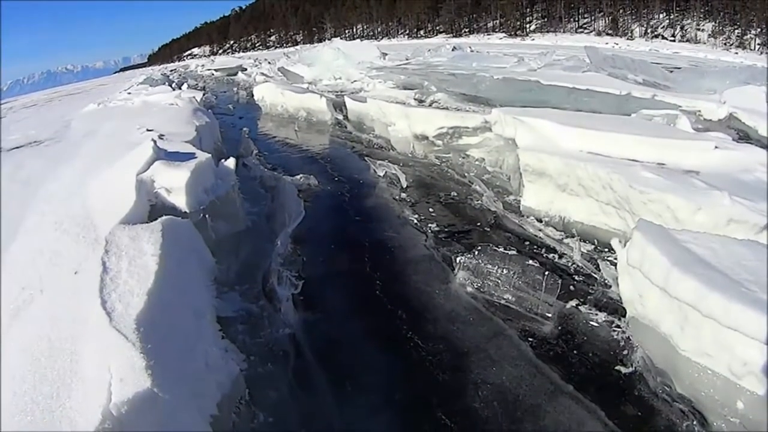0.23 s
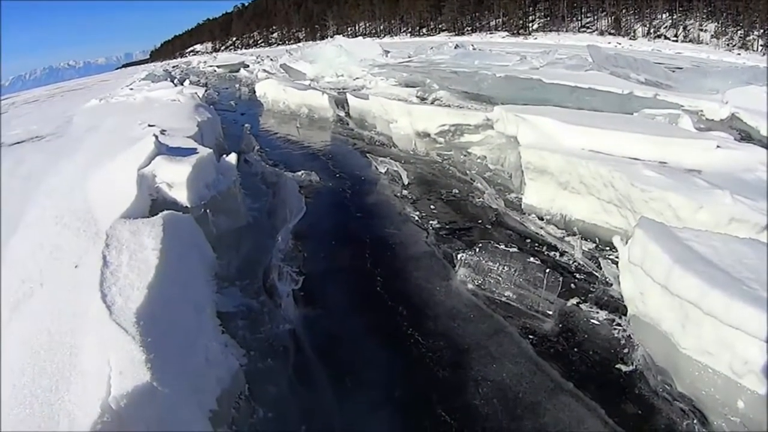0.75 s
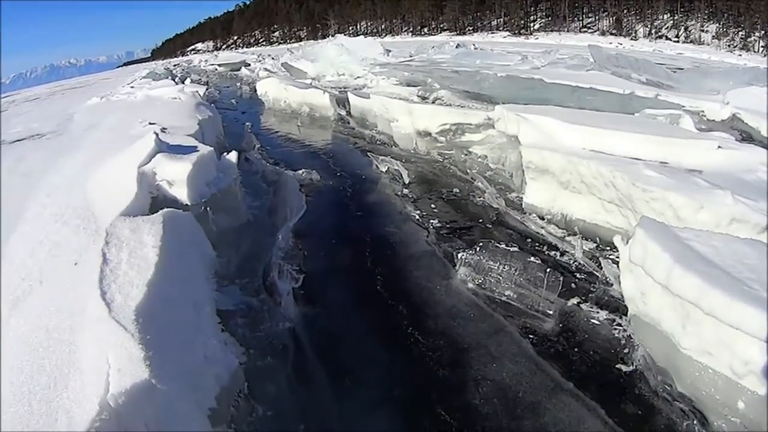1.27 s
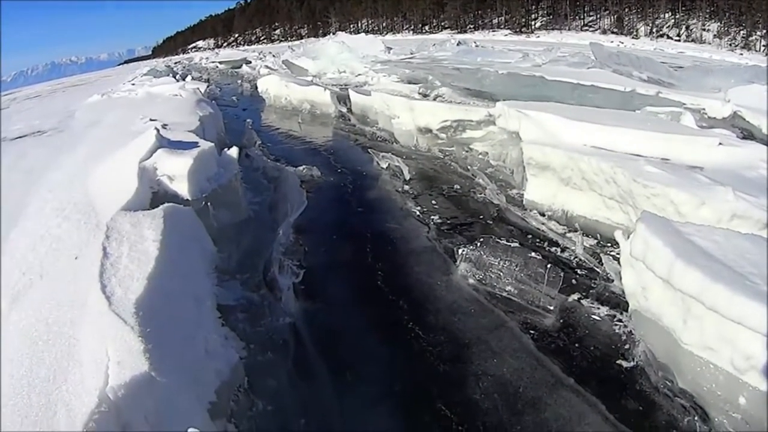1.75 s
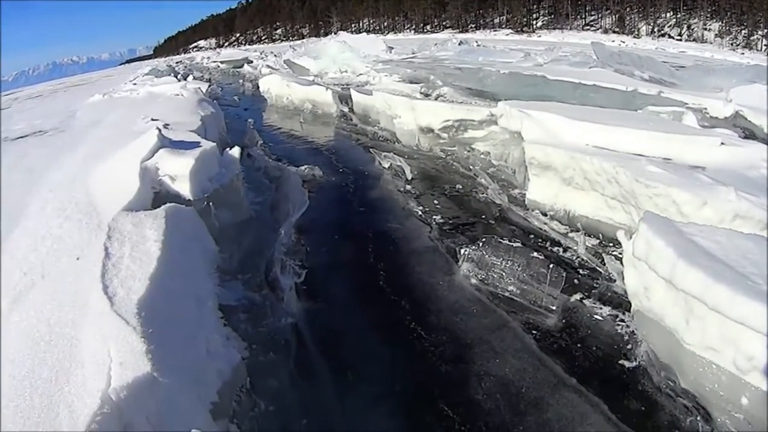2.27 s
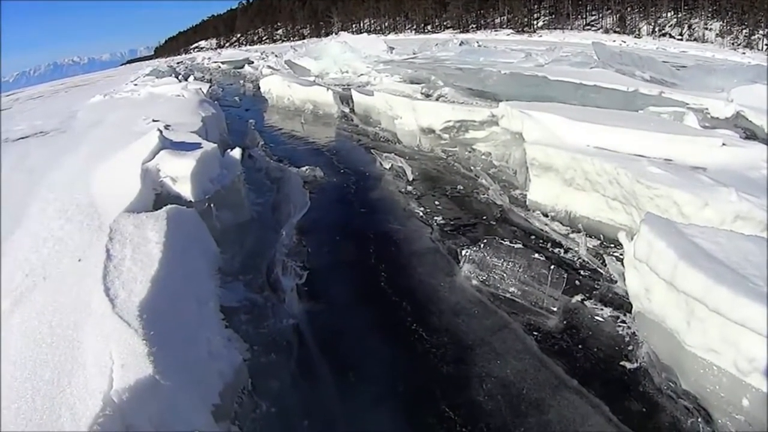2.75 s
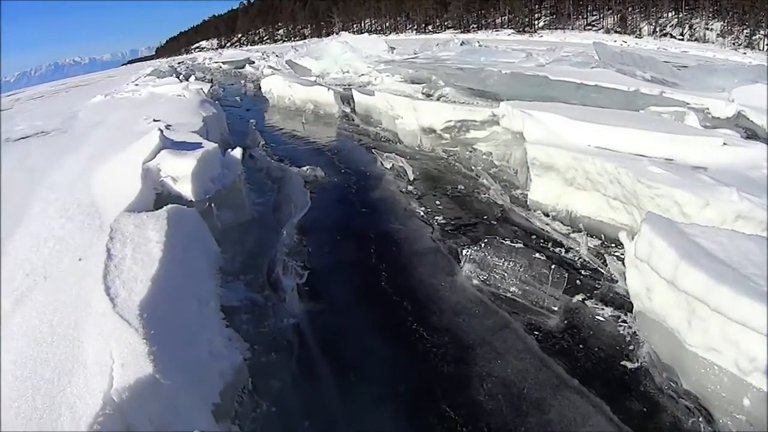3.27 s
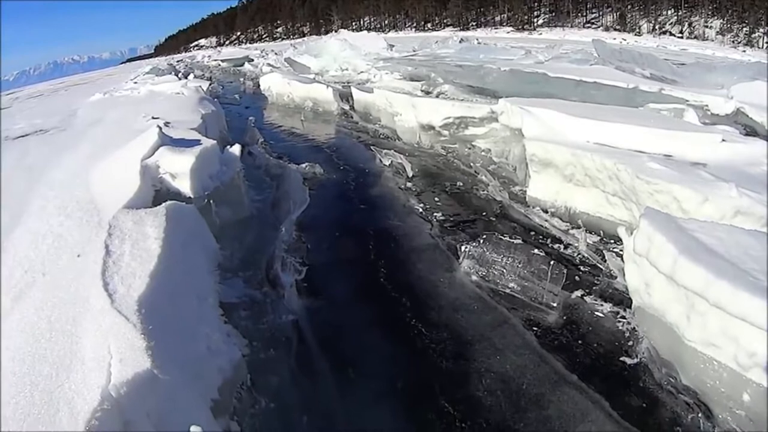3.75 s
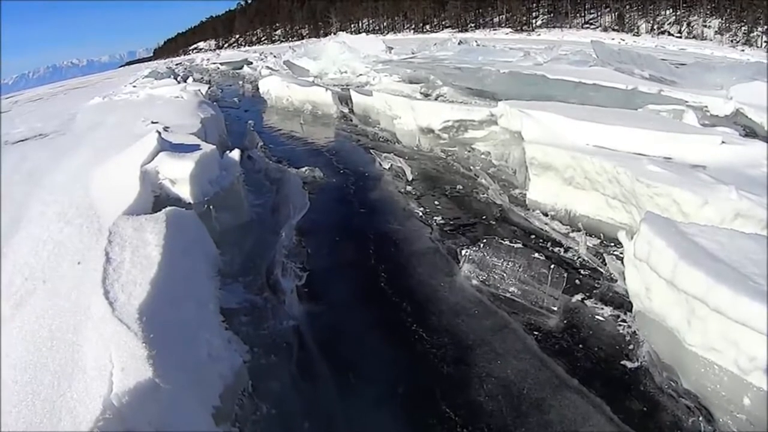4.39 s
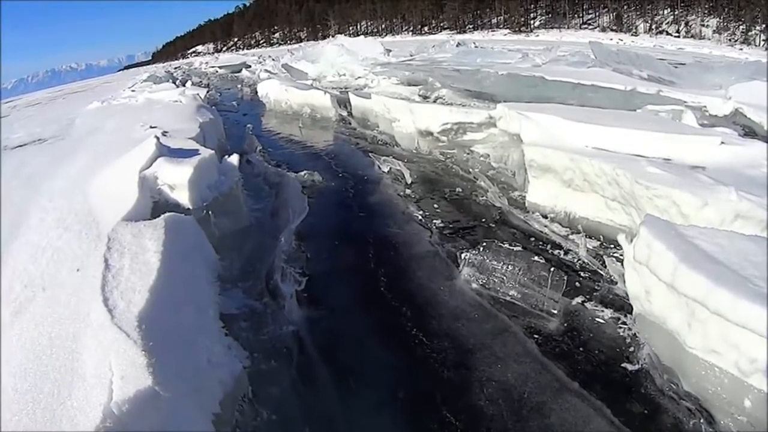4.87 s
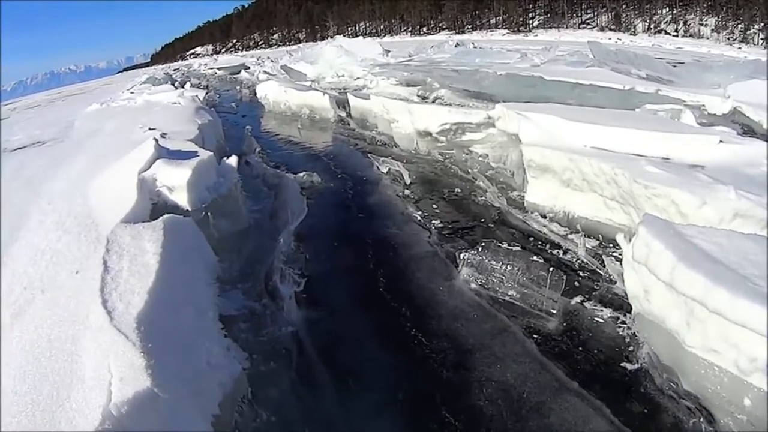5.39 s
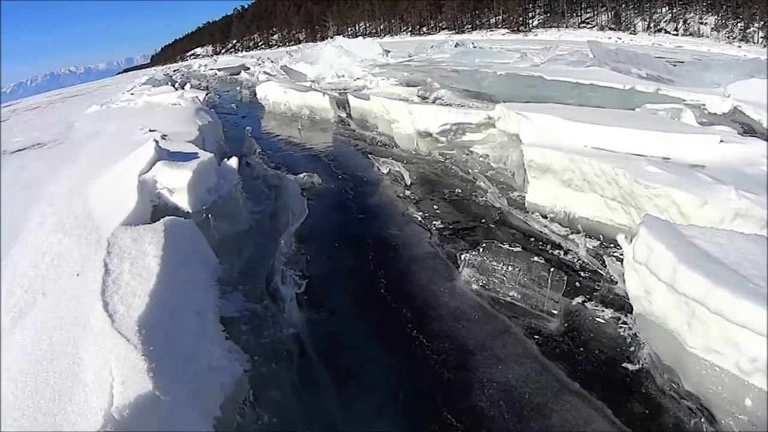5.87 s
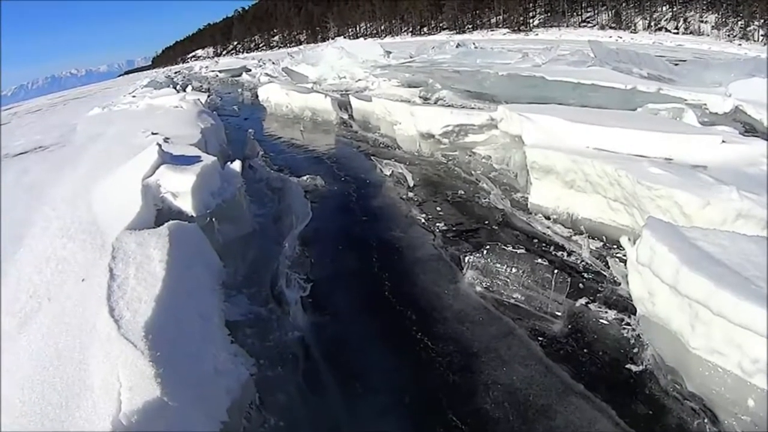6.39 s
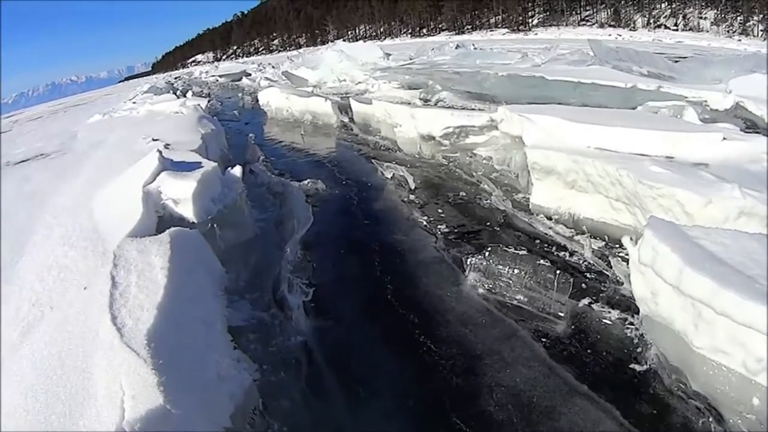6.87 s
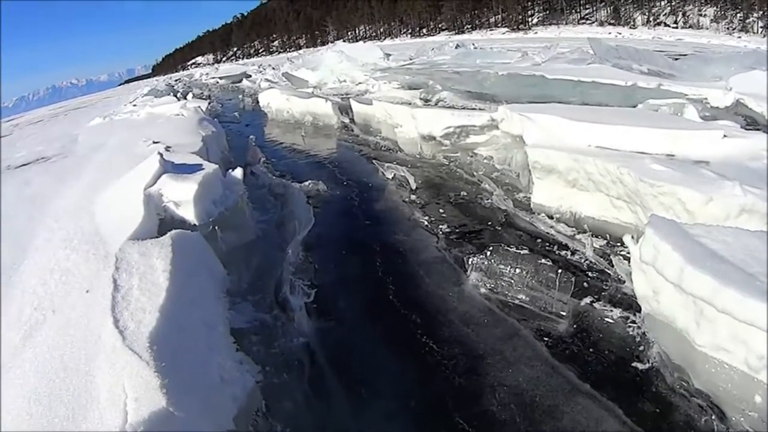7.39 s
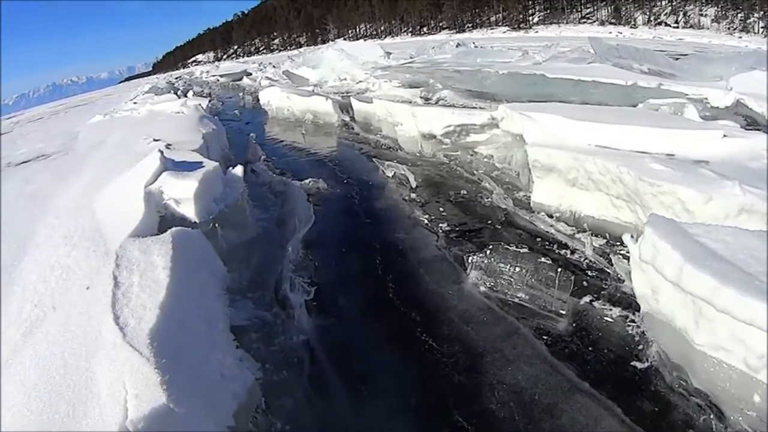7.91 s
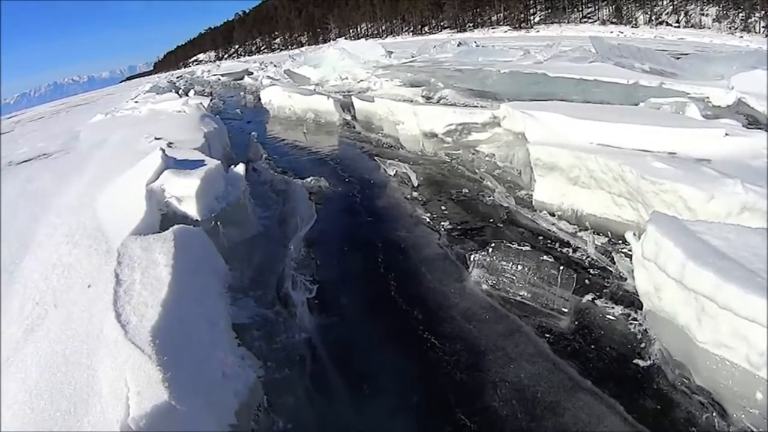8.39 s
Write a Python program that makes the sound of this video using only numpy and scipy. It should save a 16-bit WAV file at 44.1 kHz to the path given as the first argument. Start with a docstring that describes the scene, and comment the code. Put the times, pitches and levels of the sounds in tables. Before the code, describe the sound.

Outdoors on a wide frozen lake, close stereo microphones catch brittle ice clicks and tiny ticks in irregular clusters, with occasional woody low knocks from thick slabs and a thin hiss of distant splintering. The crackle never stops and grows somewhat busier. Wind only brushes the microphones early, then buffets them heavily in fluttering low puffs and sharp pops until the end.

```python
"""Dense, uneven snaps of lake ice, near and far, as it is squeezed along an open lead.
Near cracks and distant ticks are noise bursts smeared by bending waves, highs first; slabs knock in sinking tones.
Behind them the far ice merges into a hiss of filtered noise, with a fizz of splinters in clumps.
Wind buffets a pair of microphone ports, lightly at first and in gusts later: low noise, puffs and sharp pops."""
import sys
import numpy as np
from scipy import signal
from scipy.fft import rfft, irfft, next_fast_len
from scipy.io import wavfile
from scipy.ndimage import uniform_filter1d

SR = 44100
rng = np.random.default_rng(int(sys.argv[2]) if len(sys.argv) > 2 else 0)


def waveform_to_disk(signal):
    """Save audio, clipped to [-1, 1], as 16-bit WAV at the path in sys.argv[1]."""
    frames = np.transpose(np.atleast_2d(signal))
    scaled = np.clip(frames, -1, 1) * 32767
    samples = np.round(scaled).astype(np.int16)
    wavfile.write(sys.argv[1], SR, samples)


N = 381465


def from_db(db):
    """Turns decibels into an amplitude factor."""
    return 10 ** (np.asarray(db) / 20)


def rms_one(x):
    """Scales the whole array to rms 1."""
    return x / np.sqrt(np.mean(x ** 2) + 1e-20)


def in_time(rows):
    """Draws straight lines between the timed rows, one curve for each column after the time."""
    s, *columns = np.transpose(rows)
    return [np.interp(np.arange(N) / SR, s, c) for c in columns]


def at_hz(rows, hz):
    """Reads a table at the given frequencies, in straight lines over log frequency."""
    knots, *columns = np.transpose(rows)
    return [np.interp(np.log(hz + 1), np.log(knots), c) for c in columns]


def drift(rate_hz):
    """Slow chance: noise twice through a one-pole low-pass, spread 1."""
    r = np.exp(-2 * np.pi * rate_hz / SR)
    noise = rng.standard_normal(N + SR)
    settled = signal.lfilter([1], [1, -2 * r, r * r], noise)[SR:]
    return rms_one(settled)


def coloured(x, spectrum):
    """Gives each row a spectrum; rms 1 over all rows together."""
    size = next_fast_len(N)
    gain = from_db(at_hz(spectrum, np.fft.rfftfreq(size, 1 / SR))[0])
    return rms_one(irfft(rfft(x, size) * gain, size)[..., :N])


def ports(pair, table):
    """A shared and an opposed wave become left and right, with a phase lead and a balance that depend on pitch."""
    size = next_fast_len(N)
    lead_rad, alike, louder_db = at_hz(table, np.fft.rfftfreq(size, 1 / SR))
    half_alike = np.clip(alike, 0, 1) / 2
    shared, opposed = rfft(pair, size) * np.sqrt([.5 + half_alike, .5 - half_alike])
    half = from_db(louder_db / 2) * np.exp(.5j * lead_rad)   # half the difference goes to each side
    left, right = (shared + opposed) * half, (shared - opposed) / half
    return irfft([left, right], size)[:, :N]


def fizz(per_s=60, spread_db=6.0, die_ms=1.85):
    """Many splinters in rustling clumps; each size of splinter has its own pitch and comes in its own time."""
    # splinter spectrum: pitch_hz [Hz], relative_density_db [dB per Hz]
    splinter = [(1200, -21), (3000, -3), (5500, 0.5), (9000, -4.5), (12000, -2)]
    out, together = 0, drift(11)
    for hz in np.geomspace(2200, 8800, num=5):
        born = rng.random(N) < per_s * from_db(3.5 * together + 3.0 * drift(15)) / SR
        sizes = born * from_db(spread_db * np.minimum(rng.exponential(1, N), 4))
        # die_ms holds at 5 kHz; higher splinters die sooner
        dying = signal.lfilter([1], [1, -np.exp(-hz / 5 / (die_ms * SR))], sizes + 1e-18)
        band = signal.butter(1, [hz / 1.2, hz * 1.2], "band", fs=SR, output="sos")
        out = out + signal.sosfilt(band, dying * rng.standard_normal((2, N)))
    return coloured(out, splinter)


def far_ice(hiss_db):
    """Far ice merges into a hiss: flickering coloured noise, wider than it is central, with fizz mixed in."""
    # far hiss spectrum: pitch_hz [Hz], relative_density_db [dB per Hz]
    hiss_spectrum = [(160, -25), (280, 1.5), (437, -0.5), (594, -7.5), (846, -8.5), (2400, -13.5),
                     (4870, -20), (8220, -21), (11000, -22.5), (14300, -52)]
    flicker = from_db(1.5 * drift(30))
    noise = rng.standard_normal((2, N)) * flicker * [[1], [1.6]]   # shared, opposed
    hiss = coloured(noise, hiss_spectrum)
    return from_db(hiss_db + 2.06 * drift(4.4)) * (hiss + from_db(-5.5) * fizz())


def wind(buffet_below_db=5.5):
    """Eddies make lumpy low noise; puffs swell it and add a higher roar."""
    # wind rumble at the ports, before its chance surges: time_s [s], level_db [dB]
    rumble_level = [(0, -34), (.5, -35), (1.22, -38.5), (1.33, -27.5), (1.6, -37), (2.47, -35),
                    (2.62, -35.5), (3.2, -30.5), (4.3, -39), (4.82, -40), (4.88, -34.5), (5.25, -35),
                    (5.5, -34.5), (5.65, -22.5), (5.8, -29.5), (6.2, -25.5), (6.6, -30.5), (7.0, -25),
                    (8.5, -23.5), (8.65, -29)]
    # puffs within the gusts: centre_s [s], half_length_ms [ms], buffeting_db [dB], higher_roar_db [dB]
    puffs = [(1.066, 8.6, -30.5, -32), (1.29, 21, -36.5, -57), (1.678, 6.3, -33, -37), (2.818, 7, -35, -46),
             (4.251, 6.9, -35, -41), (5.321, 10, -34, -41), (5.618, 37, -25.5, -36),
             (5.693, 24, -25.5, -36), (5.82, 20, -33, -42), (5.9, 20, -26.5, -34),
             (6.14, 15.4, -22.5, -30.5), (6.258, 86, -18, -16.5), (6.508, 14.3, -22.5, -23.5),
             (6.579, 22, -22, -31), (6.669, 23, -18, -23), (6.737, 8.99, -24, -30), (6.819, 5.5, -23, -36),
             (6.876, 8, -19, -24), (6.926, 16, -21, -23), (6.975, 22.3, -31, -18.5),
             (7.023, 11.4, -24.5, -18), (7.151, 45, -29, -41), (7.46, 13, -30, -28),
             (7.579, 25, -23, -20.5), (7.648, 9.2, -19, -20.5), (7.696, 14, -26, -27.5),
             (7.755, 22, -17.5, -22.5), (7.828, 14, -21, -34), (7.95, 57, -23.5, -29),
             (8.031, 12, -23, -44), (8.155, 7.4, -25.5, -31), (8.289, 18, -19, -29),
             (8.357, 44, -27.5, -23), (8.43, 14.7, -19.5, -22), (8.59, 31.6, -19, -18.5)]
    # wind spectra, low to high: pitch_hz [Hz], relative_density_db [dB per Hz]
    rumble_spectrum = [(10, -32), (22, -11), (45, 0), (90, -2), (140, -7), (250, -24), (600, -60)]
    buffet_spectrum = [(60, -38), (130, -1.5), (200, -2), (350, -5), (500, -12.5), (800, -24.5),
                       (1500, -70)]
    roar_spectrum = [(200, -36), (400, -5.5), (520, -2.5), (850, -9.5), (1100, -17.5), (1600, -31.5),
                     (2500, -58)]
    rumble_db, = in_time(rumble_level)
    clumps, surges, ms = drift(27), drift(6.9), np.arange(N) / SR * 1000
    flutter = from_db(3.0 * drift(40))
    # steady buffeting follows the rumble
    swell = from_db(rumble_db - buffet_below_db + 4.0 * drift(22.5) + 1.53 * surges)
    roar = np.zeros(N)
    for s, half_ms, puff_db, roar_db in puffs:
        hump = np.exp(-np.abs((ms - 1000 * s) / half_ms) ** 3.7)
        swell += from_db(puff_db) * hump * flutter
        roar += from_db(roar_db) * hump
    lumps = from_db(2.9 * surges + 2.46 * clumps + 1.0 * drift(2.9))
    rumble = coloured(rng.standard_normal((2, N)) * lumps, rumble_spectrum)
    buffet = coloured(rng.standard_normal((2, N)), buffet_spectrum)
    roaring = coloured(rng.standard_normal((2, N)) * from_db(3.5 * drift(49)), roar_spectrum)
    return from_db(rumble_db) * rumble + swell * buffet + roar * roaring


def pops():
    """A broad push on both ports with a spike on the left one; the pair subtracts the ports, so the right side dips."""
    # single eddies bursting on the left port: time_s [s], burst_db [dB, before the port factors]
    bursts = [(5.902, -7), (6.209, -22), (6.8197, -6), (6.945, -8), (7.226, -4), (7.6834, -1), (8.034, 0.5),
              (8.529, -2)]
    at, spikes = [round(s * SR) for s, db in bursts], np.zeros(N)
    spikes[at] = from_db(np.array(bursts)[:, 1])
    ms = np.arange(-900, 901) / SR * 1000
    spike = np.convolve(spikes, np.exp(-(ms / 0.63) ** 2), "same")
    # the push peaks just ahead of the spike, then draws back
    push_shape = np.exp(-((ms + 1.3) / 3.5) ** 2) - 0.34 * np.exp(-((ms - 5.0) / 3.1) ** 2)
    push = np.convolve(spikes, push_shape, "same")
    return spike * [[.8], [-.75]] + .25 * push


def far_ticks(hiss_db, above_db=5.5, range_db=11, per_s=115, fall_at_5khz_ms=2.4, fall_slope=1.5):
    """Rows for small cracks further off: the clear ones, then faint ones born at random in clusters with the hiss."""
    # small clear ticks further off: time_s [s], level_db [dB, ahead of the ports], pitch_hz [Hz]
    clear = [(0.3571, -30.0, 6600), (0.4961, -34.0, 6300), (0.7682, -30.5, 3700), (0.9536, -35, 5500),
             (1.0147, -36, 5000), (1.0257, -35, 6100), (1.3388, -33, 6800), (1.8987, -31.5, 5500),
             (1.9617, -33.5, 6260), (2.0779, -33.5, 4830), (2.1638, -33, 4700), (2.2078, -33, 6300),
             (2.2148, -32.0, 5700), (2.2637, -31.5, 4400), (2.3227, -29.5, 7150), (2.341, -35, 4500),
             (2.5428, -36, 4600), (2.8341, -31.5, 5400), (2.9675, -34, 6200), (2.9949, -29.0, 4200),
             (3.2127, -29.5, 5900), (3.4351, -28, 5000), (3.5251, -34, 4700), (3.5556, -30.5, 5600),
             (3.6489, -31.5, 5600), (3.8187, -32, 3540), (3.9519, -34, 4900), (4.036, -30.0, 5200),
             (4.0834, -36, 5700), (4.2343, -32, 4600), (4.2473, -31.5, 3200), (4.4054, -27, 7000),
             (4.4505, -29, 5700), (4.7341, -32, 3300), (4.7741, -32, 4500), (4.7843, -36, 2900),
             (4.8911, -31, 4400), (4.9258, -29.5, 6500), (5.0267, -32, 5900), (5.0525, -31, 7300),
             (5.0746, -32.5, 5900), (5.0812, -33, 5500), (5.1011, -29, 3500), (5.3253, -33, 7800),
             (5.3493, -27, 4380), (5.3615, -35, 5400), (5.4686, -29.0, 5000), (5.4982, -30, 4840),
             (5.7184, -31.5, 4900), (5.7482, -25, 4000), (6.0595, -28.5, 4630), (6.1243, -29, 5470),
             (6.1394, -29.5, 6000), (6.4469, -30, 5500), (6.6524, -31, 6200), (6.7647, -31, 3200),
             (6.8219, -31.0, 5300), (6.8421, -29.0, 5100), (7.0719, -31, 5700), (7.3975, -34, 3600),
             (7.6796, -31, 2900), (7.6934, -30.5, 2900), (7.7665, -31.0, 6600), (8.0475, -30, 7400),
             (8.203, -30, 5700), (8.3304, -28, 3400), (8.3893, -29, 4600), (8.431, -33.5, 3900),
             (8.4982, -33, 5900), (8.5259, -26, 4670)]
    born = np.flatnonzero(rng.random(N) < per_s * from_db(3.0 * drift(4)) / SR)
    u = rng.random((len(born), 2))
    faint_db = hiss_db[born] + above_db - range_db * u[:, 0] ** 0.46
    faint = np.transpose([born / SR, faint_db, 3100 * 2 ** (1.6 * u[:, 1])])
    s, level_db, hz = np.vstack([clear, faint]).T
    u = rng.random((len(s), 2))
    # lower ticks last longer; each length is scattered by half either way
    fall_ms = fall_at_5khz_ms * (5000 / hz) ** fall_slope * (.5 + u[:, 0])
    thud_db = -32 + 24 * u[:, 1]
    return np.transpose([s, level_db, fall_ms, thud_db, hz])


def knocks(glide_ms=12, die_ms=6.7, scatter_db=-8, scatter_ms=20.0):
    """A few cycles that sink in pitch, as the slow low bending waves arrive last; nearby edges send them back."""
    # thick slabs knocking as they shift: time_s [s], level_db [dB, ahead of the ports], starting_pitch_hz [Hz]
    slabs = [(0.537, -26, 507.2), (1.353, -11.5, 600), (1.718, -19.5, 478), (2.426, -15, 372),
             (3.154, -19, 427), (3.261, -20.5, 480), (3.611, -19, 370), (3.905, -18, 470),
             (5.115, -24.5, 480), (5.159, -25, 484), (5.369, -21.5, 411), (5.405, -20, 530),
             (5.428, -17.5, 497), (8.108, -22, 490)]
    out, ms = np.zeros((2, N)), np.arange(3000) / SR * 1000
    for s, level_db, start_hz in slabs:
        grit = rms_one(uniform_filter1d(rng.standard_normal(3000), size=50))   # the slabs grind as they knock
        turns = np.cumsum(start_hz / (1 + ms / glide_ms)) / SR + rng.random() + 0.076 * grit
        wave = np.sin(2 * np.pi * turns) * (1 - np.exp(-ms / 0.41)) * np.exp(-ms / die_ms)
        echoes = (rng.random((2, 3000)) < .004) * rng.standard_normal((2, 3000))
        edges = echoes * from_db(scatter_db) * np.exp(-ms / scatter_ms)
        edges[0, 0] = 1   # the direct knock, shared by both ports
        at = round(s * SR)
        out[:, at:at + 5999] += from_db(level_db) * signal.fftconvolve(edges, [wave], axes=1)
    return out


def cracks(rows, rise_ms=1.38, grain_db=3.5, tail_db=-19.5, tail_ms=16.6, octaves=0.75, lag_ms=2.49,
           needle=10, needle_ms=1.3005, crisp_hz=6500, sideways=0.22):
    """Each crack is a run of tiny fractures; bending waves in the sheet bring the highs first."""
    size = 2048
    ms, hz = np.arange(size) / SR * 1000, np.fft.rfftfreq(size, 1 / SR) + 1
    # a bending wave travels as the root of its pitch: lag_ms late at 1 kHz
    spread = np.exp(-4j * np.pi * lag_ms * (np.sqrt(hz / 1000) - hz / 8000))
    thud = hz ** 2 / (hz ** 2 + 430 ** 2) / (1 + (hz / 2500) ** 4)
    highs = hz ** 2 / (hz ** 2 + crisp_hz ** 2)
    out = np.zeros((2, N + size))
    for s, level_db, fall_ms, thud_db, snap_hz in rows:
        draw = rng.standard_normal((4, size))
        noise = draw[:2] * from_db(grain_db * rms_one(uniform_filter1d(draw[2], size=24)))
        # long cracks also build up more slowly
        slower = max(1, fall_ms / 4.5) ** .9
        rise = 1 - np.exp(-(ms / rise_ms / slower) ** 2)
        shape = rise * from_db(-10 * (ms / fall_ms) ** 0.88)
        # the first break is one needle-sharp click, standing out most in the shortest cracks
        click = needle * from_db(2.6 * draw[2, -1]) * shape.max() * (4 / fall_ms) ** 0.51
        first = np.zeros((2, size))
        first[0, round(needle_ms * SR / 1000)] = click
        # rough blocks around the lead scatter a short tail
        tail = from_db(tail_db - 10 * ms / tail_ms) * (1 - np.exp(-ms / 2.0)) * (1 - ms / ms[-1])
        # and small after-breaks make it stutter
        tail = tail * from_db(4.5 * rms_one(uniform_filter1d(draw[2, ::-1], size=80)))
        snap = np.exp(-(np.log2(hz / snap_hz) / octaves) ** 2 / 2)
        # every splinter has brief resonances of its own
        snap = snap * from_db(2.77 * rms_one(uniform_filter1d(draw[3, :len(hz)], size=30)))
        colour = snap / np.linalg.norm(snap) + from_db(thud_db) * thud / np.linalg.norm(thud)
        # the highs die twice as fast
        body = rfft(first + noise * (shape + tail)) * (1 - highs)
        crisp = rfft(first + noise * (shape ** 2 / shape.max() + 0.072 * tail)) * highs
        wave = irfft((body + crisp) * colour * spread)
        height = np.sqrt(uniform_filter1d(wave[0] ** 2, size=90).max())
        wave[1] += sideways * draw[3, -2] * wave[0]   # places the crack to the left or right
        at = round(s * SR)
        out[:, at:at + size] += from_db(level_db) / height * wave
    return out[:, :N]


def near_cracks(equal_thud_hz=4570, octaves_per_db=.022, scatter_octaves=0.11):
    """Rows for the near cracks, with the centre of each snap: thicker ice thuds more and snaps lower."""
    # near cracks: time_s [s], level_db [dB, ahead of the ports], fall_by_10_db_ms [ms],
    # low_thud_against_snap_db [dB]
    near = [(0.2105,-16.5,3.5,-17),(.335,-14.5,4,-6),(0.5346,-14.5,4,-2),(0.5565,-29,11,-10),(.563,-24.5,3,-8),(0.586,-28,2,-20),(.594,-31,3,-10),(0.6159,-20,1,-14.5),(0.7374,-31,11.5,-6),(0.7761,-24.5,4,-3),
            (.9593,-24.5,4.5,-15.5),(1.039,-31,16,5),(1.0495,-22.5,3.5,-19),(1.1153,-33,2.5,-7),(1.152,-32,10,-9),(1.252,-22,3,21),(1.2672,-29,3.5,-23),(1.3486,-21.5,14,-7),(1.4298,-23,1,-14),(1.4754,-20.5,1.5,-32),
            (1.5529,-20,7,-9),(1.5742,-29,14,-5),(1.593,-24.5,3.5,-12),(1.6283,-15,4,-9.5),(1.6905,-22.5,6,-14),(1.7155,-14.5,7.5,-6.5),(1.757,-30,3.5,-16),(1.772,-28.5,3.5,-17),(1.85,-20.5,1.3,-15),
            (2.0892,-29,2.5,-35),(2.1395,-17,3.5,-10),(2.2276,-21,5,-7),(2.2688,-27.5,3.5,-2),(2.2885,-25,8,-6.5),(2.422,-22,10,-6),(2.4906,-24,5.5,-0.5),(2.5698,-17.5,6,-5.5),
            (2.6027,-19.5,5.5,-8.5),(2.636,-29,2,-37),(2.7595,-19.5,5.5,-6),(2.8756,-21,2,-21),(2.889,-16,2.5,-14),(2.948,-31,2,4),(2.9754,-20.5,4.5,-13),
            (3.0166,-15.5,4.5,-13),(3.0227,-18.5,11.5,-12),(3.073,-15.5,4,-5),(3.1103,-15,5,-1),(3.1221,-15.5,6.5,-9),(3.1507,-16,12,-6.5),
            (3.1804,-21.5,4,-15),(3.2343,-27.5,2,-18.5),(3.259,-15,6.5,-9.5),(3.301,-21.5,1.5,-18),(3.3392,-20.5,3.5,-11.5),(3.351,-18.5,1.5,-23),
            (3.4887,-29.5,11,-5),(3.5076,-14.5,5.5,-13),(3.573,-24.5,8,-8),(3.6055,-23,8,-1.5),(3.8666,-30.5,9,-9),(3.9007,-19,11,-3),(3.923,-24,2,-19),(3.9762,-16,6.5,-11),
            (4.0508,-24.5,7,3),(4.059,-16.5,5,-9),(4.0885,-16,4,-10.5),(4.1468,-22.5,3.5,-15.5),(4.2662,-22,6.5,-12.5),(4.2848,-20,2,-13),
            (4.2981,-15,3.5,-3),(4.3303,-17,4,-2),(4.3576,-30,6,-5),(4.3633,-13,5,-11),(4.3874,-23,2,-15),(4.4304,-24.5,5.5,-1),
            (4.5097,-17,3.5,-13),(4.5603,-21.5,5.5,-18),(4.6181,-21,2.5,-37),(4.6709,-23.5,14,-8),(4.6777,-15.5,4,-20),(4.696,-30,5,-21),(4.7205,-18.5,3,-11.5),
            (4.7542,-21.5,7,-7),(4.8168,-20.5,5,-16),(4.8222,-17.5,4,-13.5),(4.9815,-22,7,-8.5),(5.1135,-28.5,13.5,-6),(5.152,-27,5,-4),
            (5.2052,-19.5,3,-12),(5.3674,-15,5.5,-5),(5.3806,-15.5,2,-16),(5.4037,-16.5,5.5,-8),(5.4204,-17,8.5,-2),(5.429,-15.5,8.5,-10.5),
            (5.5442,-17,4,-7.5),(5.6173,-16,4,-14),(5.6819,-18.5,3.5,-5),(5.6984,-17,9.5,-2),(5.7277,-20.5,12,-10.5),(5.7622,-29.5,17,-5),
            (5.8135,-23.5,4.5,-4),(5.86,-25.5,2,-27),(5.8977,-28,8,-10),(5.9083,-16,6,-10),(5.9359,-16.5,6,-15),(5.961,-24,4.5,-4),(6.05,-25,5.5,-2.5),
            (6.09,-27.5,3,-32),(6.1585,-26.5,5,-8.5),(6.1926,-29,7,-11),(6.239,-31,3.5,-17),(6.3419,-15.5,5.5,-6),(6.4213,-17.5,2.5,-15),(6.51,-20.5,3,-19),(6.547,-14,5,-9),
            (6.6236,-18,3,-13),(6.6926,-26,3.5,-16),(6.7325,-16.5,3,-1),(6.7429,-20.5,6.5,-11),(6.7845,-20,4,-11),(6.8276,-17,1.5,-13),
            (6.8673,-26,.6,-8),(6.891,-21,5.5,-17),(6.9178,-22,1.5,-15),(6.9568,-23.5,4,-16.5),(6.9645,-19.5,9.5,-2.5),(6.998,-14.5,7,-6.5),
            (7.0453,-28,2,-19),(7.1474,-26,22,1),(7.1584,-23.5,6,-28),(7.1717,-20,8,-13),(7.204,-24.5,6,-24),(7.291,-28.5,4.5,-14),(7.3035,-17.5,5,-9),(7.3211,-13,4,-8.5),
            (7.3617,-23,4.5,-18.5),(7.3792,-14.5,7,-2),(7.4735,-21,0.5,-20),(7.4925,-17,6.5,-8),(7.5524,-25.5,6.5,-8),(7.63,-28.5,6,-11),
            (7.665,-23,0.5,-18),(7.7057,-17,8,-8.5),(7.7868,-20,5,-10),(7.8426,-14,6,-9.5),(7.8742,-30.5,1,-13),(7.9368,-19,2,-7),(7.956,-16.5,2,-8),
            (7.9899,-27.5,8,-19.5),(8.0823,-24,5,-28),(8.1044,-22,2.5,-8),(8.1108,-14.5,5.5,-10),(8.1229,-23.5,14,-10),(8.1455,-19,7,-8),
            (8.216,-28,3.5,-23),(8.2455,-18.5,3.5,-9.5),(8.2593,-20.5,5,-1.5),(8.3519,-26.5,9,-3),(8.403,-19.5,5,-11.5)]
    thud_db = np.array(near)[:, 3]
    octaves = scatter_octaves * rng.standard_normal(len(near)) - octaves_per_db * thud_db
    return np.column_stack([near, equal_thud_hz * 2 ** octaves])


def scene():
    """Ice and wind reach the two ports with their own leads and balances; the pops fall on the ports directly."""
    # far ice, before its slow drift: time_s [s], hiss_db [dB]
    far_level = [(0, -47.5), (1.42, -47), (1.56, -43), (2.04, -49.5), (3.25, -42), (3.64, -46.5),
                 (4.29, -42.5), (4.86, -46), (8.21, -41), (8.65, -43.5)]
    # port pair, sound from the ice: pitch_hz [Hz], left_leads_rad [radians], likeness [0-1], left_louder_db [dB]
    ice_ports = [(307, 0.14, 1, 3.5), (1050, 1.2, 0.8, 0.045), (1990, 0.91, 0.54, 0.8),
                 (4900, 0.76, 0.9, 1), (10000, 0.22, 0.64, 1.5)]
    # port pair, eddies that pass the right port first: pitch_hz [Hz], left_leads_rad [radians],
    # likeness [0-1], left_louder_db [dB]
    wind_ports = [(40, -.2, .95, 3.0), (160, -.85, .82, .2), (400, -1.6, .58, -.5), (900, -2.3, .75, .1)]
    hiss_db, = in_time(far_level)
    bed = far_ice(hiss_db)
    air = ports(wind(), wind_ports) + pops()
    distant = cracks(far_ticks(hiss_db), tail_db=-15, octaves=0.65)
    ice = cracks(near_cracks()) + knocks() + distant + bed
    return ports(ice, ice_ports) + air


def record(dry, cutoff_hz=11100):
    """The highest peaks are slightly rounded; the top is cut steeply, in two steps."""
    shelf = signal.ellip(6, .5, 21, cutoff_hz, fs=SR, output="sos")
    top = signal.cheby1(4, .5, 1.08 * cutoff_hz, fs=SR, output="sos")
    rounded = 1.5 * np.tanh(dry / 1.5)
    return signal.sosfilt(np.vstack([shelf, top]), rounded)


dry = scene()
out = record(dry)
waveform_to_disk(out)
```